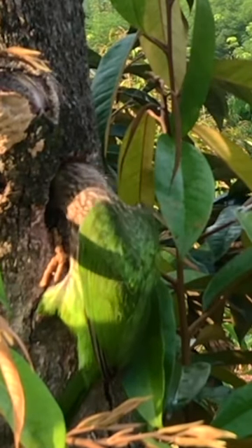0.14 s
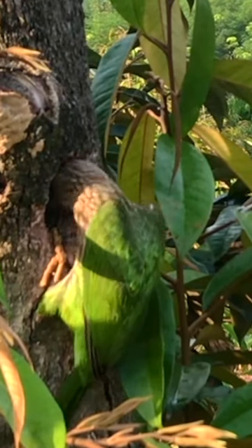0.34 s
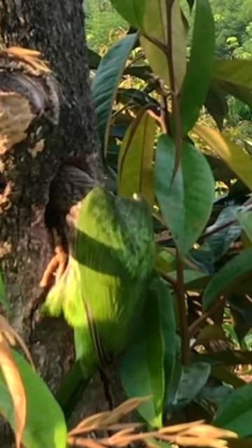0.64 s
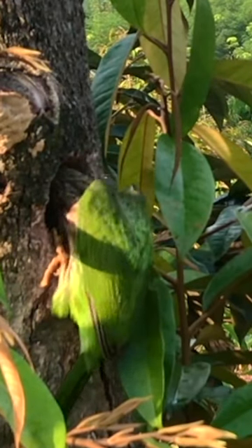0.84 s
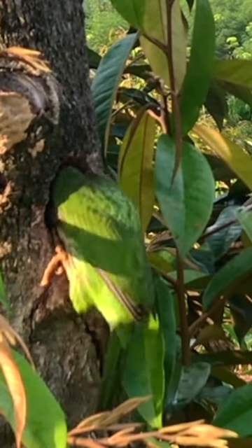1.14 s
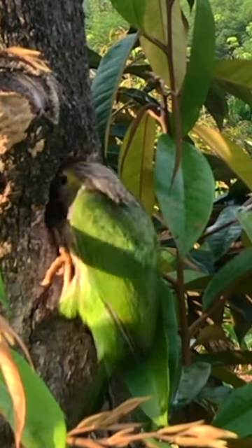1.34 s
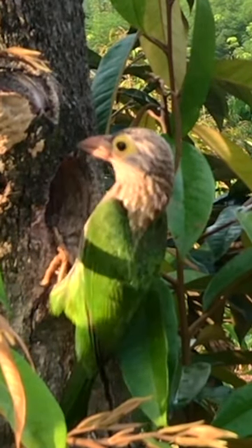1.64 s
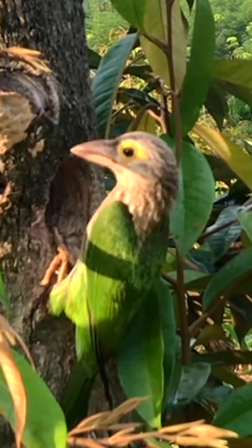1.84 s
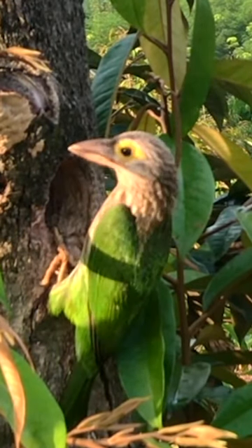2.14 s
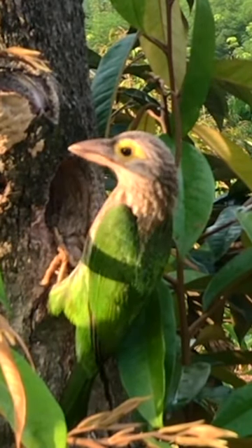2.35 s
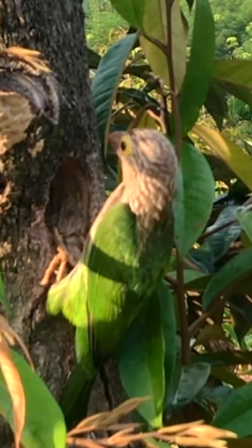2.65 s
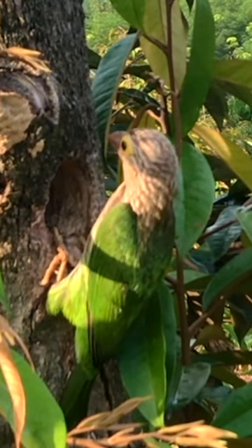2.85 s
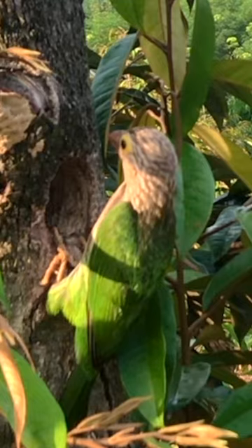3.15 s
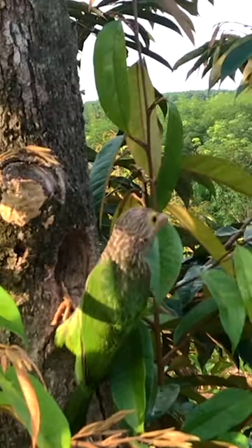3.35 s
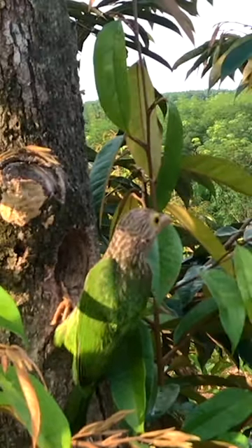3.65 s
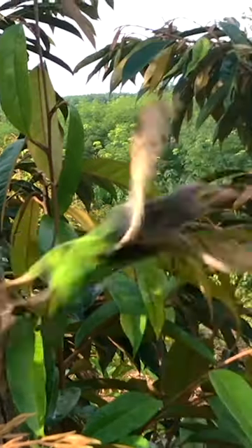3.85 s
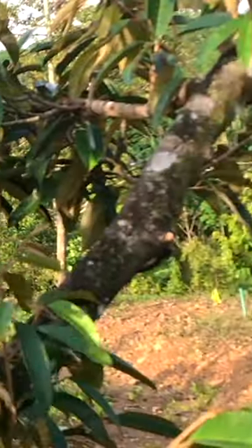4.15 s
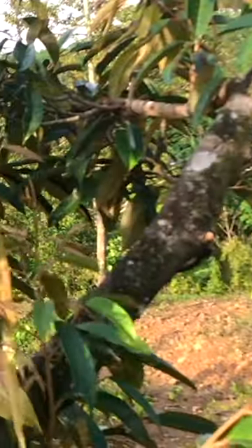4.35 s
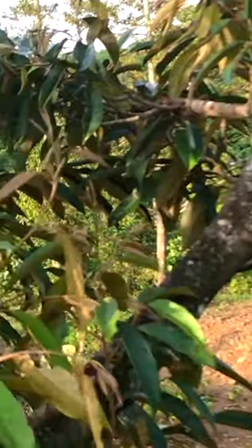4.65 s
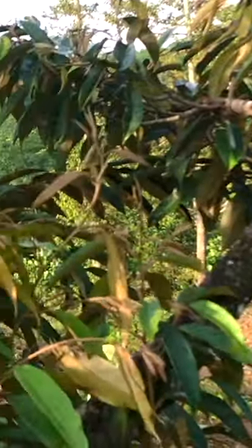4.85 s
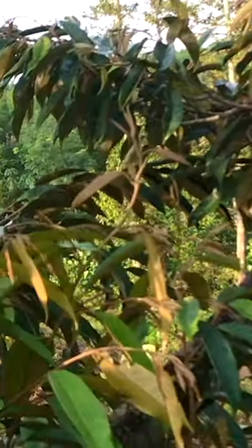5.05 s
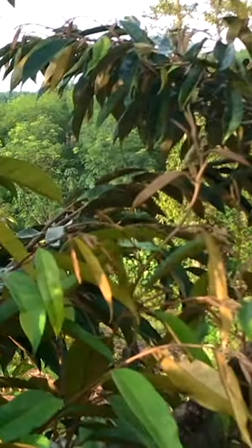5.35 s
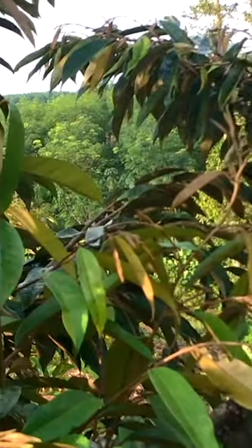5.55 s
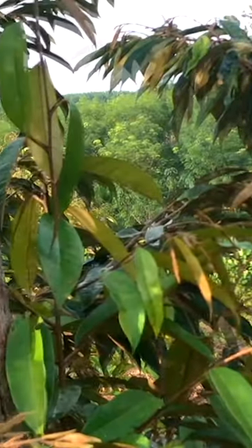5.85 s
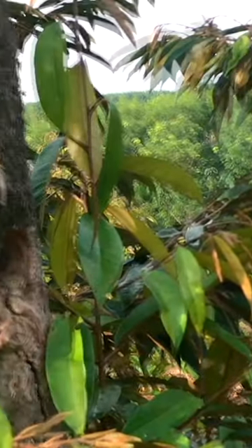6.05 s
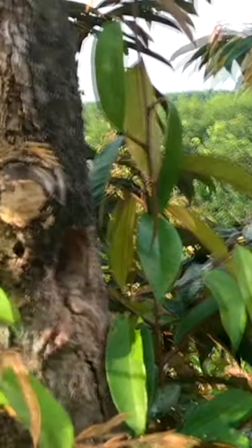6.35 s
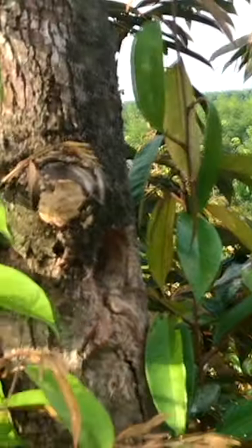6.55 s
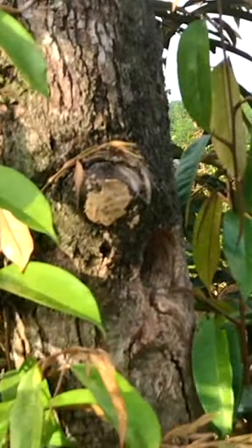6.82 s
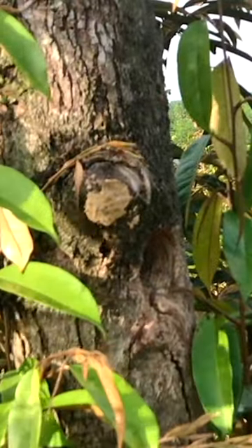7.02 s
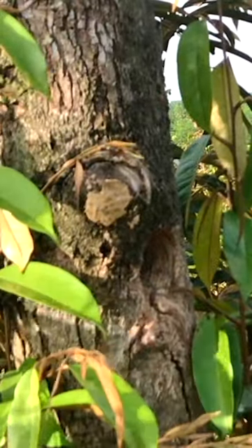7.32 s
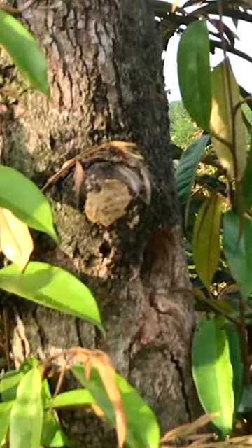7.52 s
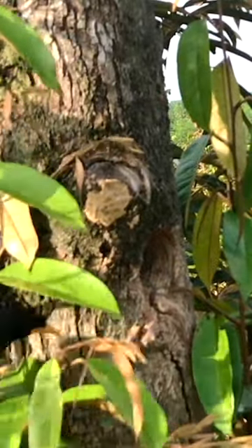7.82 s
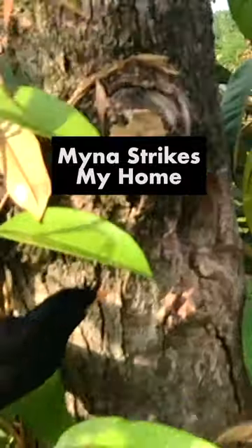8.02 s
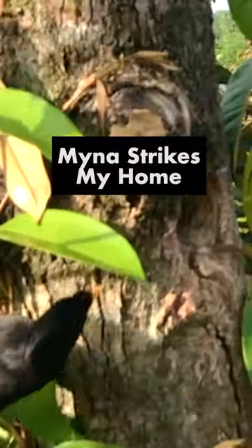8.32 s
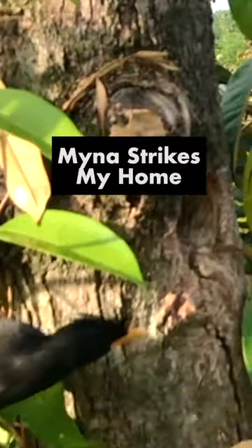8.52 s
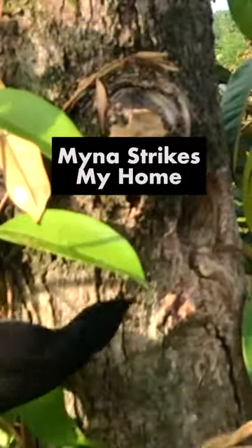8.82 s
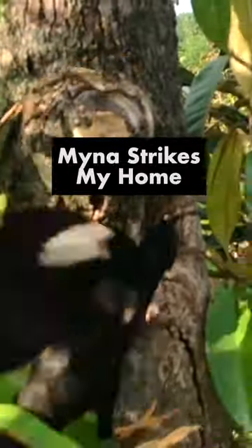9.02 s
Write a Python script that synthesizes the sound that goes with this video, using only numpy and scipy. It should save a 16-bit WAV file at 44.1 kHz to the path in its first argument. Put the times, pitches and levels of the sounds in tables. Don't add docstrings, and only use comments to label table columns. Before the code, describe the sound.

A steady high buzz of cicadas and rapid cricket chirps fill a hot orchard, close to a handheld microphone. Inside a tree hole, nestlings give short soft peeps and hoarse, wheezy rasps, with one bright squeal. The parent takes off with a snap and soft wing beats. The chicks fade, a far bird trills three times, and another bird scrabbles at the bark with crackling feathers and scratching claws.

```python
import sys
import numpy as np
from scipy import signal
from scipy.fft import rfft, irfft
from scipy.io import wavfile
from scipy.ndimage import uniform_filter1d

SR = 44100
rng = np.random.default_rng(int(sys.argv[2]) if len(sys.argv) > 2 else 0)


def amplitude_ratio(level_db):
    exponent = np.asarray(level_db, float) / 20
    return 10 ** exponent


def transcribe(signal):
    frames = np.atleast_2d(signal).T
    limited = np.clip(frames, -1, 1)
    pcm = np.round(limited * 32767).astype(np.int16)
    wavfile.write(sys.argv[1], SR, pcm)


N = 404838
T = np.arange(N) / SR
LATER_S = 6.33


def evened(x):
    return x / np.sqrt(np.mean(x ** 2) + 1e-20)


def add(mix, s, sound):
    part = mix[round(s * SR):][:len(sound)]
    part += sound[:len(part)]


def noise():
    return rng.standard_normal(N)


def sweep(hz):
    return np.sin(2 * np.pi * np.cumsum(hz) / SR)


def column(rows, size=1):
    table = np.array(rows)
    return np.interp(T, table[:, 0], table[:, size])


def shifted(early_db, late_db, at_s):
    return np.where(T > at_s, late_db, early_db)


def coloured(x, points):
    hz, db = np.transpose(points)
    f = np.fft.rfftfreq(N, 1 / SR) + 1
    shape_db = np.interp(np.log(f), np.log(hz), db, -90, -90)
    return evened(irfft(rfft(x) * amplitude_ratio(shape_db), N))


def rung(x, modes):
    f = np.fft.rfftfreq(N, 1 / SR)
    response = sum(amplitude_ratio(db) / (1 + (2 * (f - hz) / width) ** 2) for hz, width, db in modes)
    return evened(irfft(rfft(x) * response, N))


def resonate(x, hz, width):
    turn = np.exp(2j * np.pi * np.cumsum(hz) / SR)
    r = np.exp(-np.pi * width / SR)
    return evened((turn * signal.lfilter([1], [1, -2 * r, r * r], x / turn)).real)


def drift(hz):
    z = rfft(noise())
    return evened(irfft(z * (np.arange(len(z)) < hz * N / SR), N))


def grainy(per_s, size_db, hiss):
    sizes = amplitude_ratio(size_db * np.minimum(rng.exponential(1, N), 3))
    grains = sizes * (rng.random(N) < per_s / SR)
    clumps = evened(signal.lfilter([1], [1, -.98], grains))
    return (clumps + hiss) * noise()


def stroke(first_hz, last_hz, length, rise, overtone_db=()):
    u = np.linspace(0, 1, round(length * SR))
    turns = 2 * np.pi * np.cumsum(first_hz + (last_hz - first_hz) * u) / SR
    tone = np.sin(turns) + sum(amplitude_ratio(db) * np.sin((k + 2) * turns) for k, db in enumerate(overtone_db))
    return tone * np.minimum((u / rise) ** 0.27, (1 - u) / (1 - rise))


def leaves(x, t60, wet_db):
    t = np.arange(SR // 2) / SR
    tail = rng.standard_normal(len(t)) * amplitude_ratio(-60 * t / t60) * (t > .004)
    return x + amplitude_ratio(wet_db) * signal.oaconvolve(x, tail / np.linalg.norm(tail))[:N]


# f/Hz, level/dB per Hz
HISS = [(65, -35), (110, -1), (425, -16), (2880, -21), (4540, -23.5), (5710, -6), (6300, 2), (8130, -20.5),
        (11100, -10.5), (12300, -20), (15800, -21.5)]
RUMBLE = [(30, -21), (44, -5), (55, 9.5), (66, -9)]
DRONE = [(50, -37), (68, 5), (110, -7), (200, -16.5)]


def air():
    hiss = amplitude_ratio(-59) * coloured(noise(), HISS)
    rumble = amplitude_ratio(shifted(-65, -71.5, at_s=4.5)) * coloured(noise(), RUMBLE)
    drone = amplitude_ratio(shifted(-68, -65.5, at_s=5) + 0.5) * coloured(noise(), DRONE)
    return hiss + rumble + drone


def cicadas():
    rattle = np.cumsum(129.8 + .3 * drift(1)) / SR % 1
    puffs = np.exp(-rattle / .35)
    drive = noise() * (puffs + np.where(T < LATER_S, .35, .9))
    early = rung(drive, [(9910, 840, -0.6), (10800, 410, -0.4)])
    late = rung(drive, [(9700, 900, -3), (10950, 880, 7)])
    share = np.clip((T - 6) / .5, 0, 1)
    return amplitude_ratio(shifted(-63.5, -61.5, at_s=6.5) + 0.3) * evened((1 - share) * early + share * late)


# t/s, level/dB
THREES = [(6.351, -7), (6.41, -7.5), (7.01, -5), (7.052, -6), (7.095, -5), (7.155, -5), (7.274, -5),
          (7.314, -4), (7.375, -6.5), (7.762, -7.5), (8.148, -5), (9.168, -8.5)]


def threes():
    rows = np.array(THREES)
    parts = []
    for a, b in zip(rows, rows[1:]):
        phrases = max(round((b[0] - a[0]) / .059), 1)
        parts.append(np.linspace(a, b, phrases, endpoint=False))
    starts = np.concatenate(parts + [rows[-1:]])
    out = np.zeros(N)
    for (s, db), room in zip(starts, np.diff(starts[:, 0], append=10)):
        for k in range(3 if room > .05 else 2):
            level_db = db - 1.5 * k + 1.5 * rng.standard_normal()
            add(out, s + .0168 * k, amplitude_ratio(level_db) * stroke(6090, 6230, .011, .55))
    return out


def shrill_chorus():
    beat = np.cumsum(56.6 * (1 + 0.0453 * drift(5))) / SR % 1
    tone = sweep(5960 + 240 * beat + 25 * drift(30)) * amplitude_ratio(2 * drift(45))
    pulses = tone * np.sin(np.pi * np.clip(beat / 0.58, 0, 1))
    early = 1.74 * leaves(pulses, 0.18, wet_db=-12.5)
    late = 3.3 * leaves(threes(), .2, wet_db=-12)
    crowd = rung(noise(), [(6187, 220, 1.5), (6517, 280, -4), (7210, 90, -10.5)])
    return amplitude_ratio(-53.5) * np.where(T < LATER_S, .7 * early + .65 * crowd, late + .3 * crowd)


def far_crickets():
    far = np.zeros(N)
    for first_hz, last_hz in [(4650, 4380), (4780, 4000), (5200, 4800)]:
        starts = (rng.random(N) < 22 / SR) * amplitude_ratio(2.2 * noise())
        far += signal.oaconvolve(starts, stroke(first_hz, last_hz, 0.0128, 0.63))[:N]
    blur = rung(noise(), [(3250, 270, -15), (4500, 360, 5.5), (5080, 810, -4)])
    scattered = evened(leaves(far, 0.36, wet_db=-23))
    return amplitude_ratio(-65.5 + 0.64 * (T > 6.3)) * scattered + amplitude_ratio(-61.5) * blur


# first t/s, last t/s, level/dB
LOW_BOUTS = [
    (6.44, 6.76, -67),
    (6.9, 7.07, -73),
    (7.52, 7.62, -69),
    (8.261, 8.711, -66.5),
    (8.76, 8.81, -68),
]


def low_cricket():
    out = np.zeros(N)
    for first, last, db in LOW_BOUTS:
        for s in np.linspace(first, last, round((last - first) / .0343) + 1):
            add(out, s, amplitude_ratio(db + 2 * rng.standard_normal()) * stroke(3380, 3140, 0.022, 0.57))
    return amplitude_ratio(-4.5) * leaves(out, .15, wet_db=-0.5)


# start t/s, end t/s, first f/Hz, last f/Hz, level/dB
WHISTLES = [(4.75, 4.807, 320, 487, -68), (4.846, 6.489, 467, 408.3, -76), (5.743, 6.197, 540, 482, -70.5),
            (5.747, 6.42, 1076, 928, -70.5), (8.4, 8.47, 2350, 2340, -66), (8.82, 8.875, 2310, 2270, -66),
            (6.65, 6.69, 4061, 3300, -67), (7.09, 7.13, 4030, 3600, -65), (7.315, 7.35, 4000, 3230, -64),
            (7.503, 7.555, 3790, 2850, -67), (8.539, 8.57, 4400, 3120, -63)]


def whistles():
    out = np.zeros(N)
    for start, end, first_hz, last_hz, db in WHISTLES:
        pitch = np.linspace(first_hz, last_hz, round((end - start) * SR))
        wobble = evened(uniform_filter1d(rng.standard_normal(len(pitch)), size=400))
        tone = sweep(pitch * (1 + .018 * wobble))
        add(out, start, amplitude_ratio(db) * tone * signal.windows.tukey(len(pitch), .3))
    return out


# first note t/s, last note t/s, first f/Hz, settled f/Hz, level/dB
TRILLS = [
    (6.542, 6.856, 1886, 1806, -55.5),
    (7.422, 7.738, 2000, 1880, -51.5),
    (8.386, 8.703, 1940, 1892, -51),
]


def trills():
    out = np.zeros(N)
    for first, last, first_hz, hz, db in TRILLS:
        count = round((last - first) / .0355) + 1
        for k, s in enumerate(np.linspace(first, last, count)):
            u = np.linspace(0, 1, round(780 + 35 * k))
            pitch = hz + (first_hz - hz) * np.exp(-k / 1.4) + (70 - 18 * k) * (.5 - u)
            weak_db = -3 * (k == 0) - 1.8 * (k == count - 1)
            add(out, s, amplitude_ratio(db + weak_db) * sweep(pitch) * signal.windows.tukey(len(u), .45))
    return out


def far_singers():
    out = low_cricket() + whistles() + trills()
    return leaves(out * amplitude_ratio(1.1 * drift(30)), .9, wet_db=-10)


# first stroke t/s, level/dB
DEEP_GROUPS = [(0.26, -41.5), (.469, -40), (0.676, -40), (.884, -39.5), (1.125, -40.5), (2.285, -52),
               (5.377, -43), (5.601, -43), (5.821, -45.5), (6.042, -48.5), (6.261, -52), (8.746, -45)]
# t/s, level/dB
STRAY_STROKES = [
    (8.812, -48),
    (8.948, -49),
    (8.982, -48),
    (9.02, -41),
    (9.162, -46),
]


def deep_cricket():
    out = np.zeros(N)
    for s, db in DEEP_GROUPS:
        for k, c in enumerate(rng.standard_normal(3)):
            sound = stroke(5330 + 40 * c, 4350, .024, 0.65, overtone_db=(-30,))
            add(out, s + .0343 * k, amplitude_ratio(db - 2 * (k == 0) + c) * sound)
    for s, db in STRAY_STROKES:
        add(out, s, amplitude_ratio(db) * stroke(5700, 4340, 0.0178, 0.95, overtone_db=(-30,)))
    return out


# first group t/s, last group t/s, strokes a group, level/dB
HIGH_SERIES = [(.079, .079, 3, -41.5), (.364, .364, 1, -39), (.587, .587, 3, -46), (0.808, 2.803, 3, -46),
               (3.097, 3.097, 2, -45), (5.128, 5.128, 2, -43.5), (5.347, 5.776, 3, -41),
               (5.992, 5.992, 3, -45), (6.208, 6.208, 3, -49), (6.82, 6.82, 3, -56), (7.05, 7.05, 2.2, -54),
               (7.266, 7.479, 2, -52), (8.205, 8.205, 4, -51), (8.462, 8.462, 4, -49),
               (8.722, 8.722, 2.4, -51)]


def high_cricket():
    out = np.zeros(N)
    for first, last, strokes, db in HIGH_SERIES:
        for s in np.linspace(first, last, round((last - first) / .222) + 1):
            for k in range(round(strokes)):
                swell_db = min(k, 2) - min(strokes - 1, 2) / 2
                level_db = db + swell_db + 2.6 * rng.standard_normal()
                first_hz = 5300 + 50 * rng.standard_normal()
                sound = stroke(first_hz, 4750, 0.0169, 0.86, overtone_db=(-30,))
                add(out, s + .0362 * k, amplitude_ratio(level_db) * sound)
    return out


def bout(first, last, beats, db, lag):
    k = np.arange(round(beats) + 1)
    late = lag * (1 - np.exp(-k / 2.5))
    times = first + late + (last - first - late[-1]) * k / k[-1]
    return np.transpose([times, db - 193 * lag * np.exp(-k / 0.51)])


# first t/s, last t/s, beats, level/dB, lag of the cold start/s
NEAR_BOUTS = [(0.215, 1.085, 18, -37, 0.027), (1.128, 2.159, 21, -37, 0.0024),
              (2.398, 2.506, 2, -41, 0.013), (2.562, 3.277, 15, -37, 0.015),
              (3.322, 3.994, 14, -37, 0.0018), (4.545, 4.661, 2, -45, 0.0037),
              (4.717, 5.747, 21, -37, 0.014), (5.969, 6.129, 3, -41, 0.015), (6.182, 6.279, 2, -43, 0),
              (6.324, 6.43, 2, -48, 0.0015), (6.54, 6.783, 5, -40, 0.02), (7.233, 7.348, 2, -46.5, .003),
              (7.397, 7.824, 9, -39, 0.016), (8.265, 8.318, 1, -38.5, 0.0016),
              (8.816, 8.871, 1, -41.5, 0.0074), (8.917, 9.151, 5, -38, 0.0089)]


def near_cricket():
    out = np.zeros(N)
    for s, db in np.concatenate([bout(*row) for row in NEAR_BOUTS]):
        a, b, c = rng.standard_normal(3)
        overtones = (-24, -29 - 12 * (s > LATER_S))
        opening = stroke(4700 + 35 * a, 4434, 0.01, 0.85, overtones)
        closing = stroke(4690 + 35 * b, 4404, 0.013, 0.85, overtones)
        add(out, s + .003, amplitude_ratio(db - 0.55 + 1.2 * c) * opening)
        add(out, s + .0165, amplitude_ratio(db - 1 + 0.83 * b) * closing)
    return out


def crickets():
    three = near_cricket() + high_cricket() + deep_cricket()
    return amplitude_ratio(-1.4) * leaves(three, 0.12, wet_db=-10) + far_crickets()


# f/Hz, level/dB per Hz
BODY = [(180, -21), (400, -10.5), (900, -9), (2000, -1), (3800, 5), (5500, 7), (8000, -2.5), (10000, -16)]
FEATHER = [(7000, -4), (9500, 0), (12500, -1), (15900, 0)]
# t/s, body level/dB, feather level/dB
FLURRIES = [
    [(0.7, -92, -76), (1.036, -99, -84), (1.1, -91, -83.5)],
    [(2.2, -89, -81), (2.29, -71, -82), (2.4, -69, -82), (2.46, -68, -78), (2.55, -73.5, -86),
     (2.62, -67, -82), (2.7, -96, -86), (2.84, -87, -88), (2.9, -87, -73), (3.0, -92, -86)],
    [(3.85, -96, -79), (3.894, -75, -72), (4.5, -82, -84)],
    [(7.5, -81, -80), (7.876, -69.5, -63), (8.16, -82.5, -91)],
    [(8.87, -73, -86), (8.93, -78, -67), (8.945, -66.5, -59), (8.965, -72, -70), (9.008, -65.5, -64),
     (9.035, -77, -69), (9.068, -69.5, -64), (9.105, -66.5, -67), (9.14, -78, -75), (9.18, -76, -64)],
]


def flurries():
    drive = grainy(800, 2.8, .6) * amplitude_ratio(2 * drift(40))
    body, feather = coloured(drive, BODY), coloured(drive, FEATHER)
    pushes = sum(amplitude_ratio(-2.5 * k) * np.exp(-((T - 4.06 - k / 13) / 0.01) ** 2) for k in range(4))
    out = amplitude_ratio(-59) * pushes * rung(noise(), [(320, 310, 0)])
    for rows in FLURRIES:
        fade = np.clip(np.minimum(T - rows[0][0], rows[-1][0] + 0.037 - T) / 0.0061, 0, 1)
        out += fade * amplitude_ratio(column(rows) + 18.5) * body
        out += fade * amplitude_ratio(column(rows, size=2) + 10) * feather
    return out


# t/s, peak level/dB
SNAPS = [(3.897, -37), (4.0087, -28.5), (4.055, -36), (4.1325, -40.5), (4.214, -38), (6.807, -38),
         (6.9122, -41), (7.6695, -33), (7.866, -34), (7.8814, -51), (8.08, -34.5), (8.117, -47),
         (8.371, -45), (8.937, -48), (8.945, -32), (8.97, -32), (8.976, -32), (9.0079, -32), (9.062, -35),
         (9.071, -36), (9.095, -41), (9.1053, -30), (9.177, -36)]


def snaps():
    out, t = np.zeros(N), np.arange(900) / SR
    for s, db in SNAPS:
        fall = amplitude_ratio(-60 * t / .006) + .5 * amplitude_ratio(-60 * t / .04)
        add(out, s, amplitude_ratio(db - 7) * rng.standard_normal(900) * fall)
    bright = signal.lfilter(*signal.butter(1, 1500, "high", fs=SR), out)
    return signal.sosfilt(signal.butter(10, 15600, fs=SR, output="sos"), bright)


# t/s, peak level/dB, ring f/Hz
CATCHES = [(6.772, -56, 2700), (6.807, -54, 2600), (7.143, -51, 3220), (8.918, -58, 3500),
           (8.944, -55, 3000), (8.971, -47, 2540), (8.983, -51, 3400), (9.007, -45, 3390),
           (9.06, -45, 3940), (9.0656, -40, 3680), (9.0708, -39, 3600), (9.077, -37, 3720),
           (9.083, -45, 3500), (9.0948, -41, 3730), (9.104, -39, 3330), (9.11, -51, 3400),
           (9.172, -44, 3320), (9.177, -51, 2800)]


def catches():
    out, t = np.zeros(N), np.arange(700) / SR
    for s, db, hz in CATCHES:
        ring = amplitude_ratio(-60 * t / 0.011) * np.sin(2 * np.pi * hz * t)
        scratch = rng.standard_normal(700) * amplitude_ratio(-60 * t / 0.017)
        hit = signal.fftconvolve(scratch, ring)
        add(out, s, amplitude_ratio(db) * hit / abs(hit).max())
    return leaves(out, 0.077, wet_db=-7)


# from t/s, until t/s, level drop/dB
HUSHES = [
    (0.532, 0.59, -3.5),
    (0.922, 0.959, -5),
    (1.853, 1.945, -6),
    (2.043, 2.092, -12),
    (2.685, 2.757, -5),
]


def hush():
    return amplitude_ratio(sum(db * np.clip(np.minimum(T - a, b - T) / .006, 0, 1) for a, b, db in HUSHES))


# start t/s, end t/s, first pulses/s, last pulses/s, peak level/dB
CREAKS = [
    (.325, .405, 122, 88, -53),
    (0.413, 0.436, 200, 200, -48),
    (0.543, 0.589, 90, 120, -48),
    (0.587, .626, 130, 200, -42.5),
    (.86, 0.922, 150, 140, -53),
]


def creaks():
    out, t = np.zeros(N), np.arange(400) / SR
    ring = np.sin(2 * np.pi * 3350 * t) + 0.37 * np.sin(2 * np.pi * 1700 * t)
    click = amplitude_ratio(-60 * t / .012) * ring
    for start, end, first, last, db in CREAKS:
        rate = np.linspace(first, last, round((end - start) * SR))
        for at in np.flatnonzero(np.diff(np.floor(np.cumsum(rate) / SR))):
            s = start + at / SR + 0.00098 * rng.standard_normal()
            add(out, s, amplitude_ratio(db + 2.5 * rng.standard_normal()) * click)
    return out


# start t/s, length/s, level/dB, first f/Hz, last f/Hz
WHEEZES = [(0.02, 0.12, -61.5, 3250, 3200), (0.413, 0.027, -56, 3600, 3300),
           (0.451, 0.068, -51, 3080, 3060), (0.609, 0.095, -47, 3010, 3150),
           (0.681, 0.047, -51, 3250, 3830), (0.81, 0.027, -48, 4020, 3850), (0.817, 0.034, -46, 3030, 2920),
           (0.869, .05, -52.5, 2920, 2990), (0.967, .03, -58, 3950, 3900), (1.015, 0.066, -57, 4000, 2720),
           (1.099, .05, -57.5, 2850, 3080), (1.253, .06, -62, 3270, 2900), (1.315, .025, -54, 3470, 3470),
           (1.761, 0.046, -62, 3340, 2980), (2.111, 0.072, -49.5, 3970, 4400),
           (2.233, .06, -77, 3930, 3900), (2.27, .17, -55, 4000, 3950), (2.265, 0.16, -59, 5320, 5100),
           (2.453, 0.082, -55, 4000, 4260), (2.589, 0.076, -50, 4400, 3820),
           (2.638, 0.048, -52.5, 3000, 3100), (2.818, .1, -54.5, 2940, 3000),
           (1.955, 0.077, -61.5, 1600, 2380), (2.873, .045, -49, 4200, 3800),
           (2.918, 0.066, -48.5, 3980, 4050), (3.51, 0.13, -64, 2980, 3300), (4.067, .06, -61, 3250, 3300),
           (4.1, 0.066, -55.5, 4080, 4200), (4.22, 0.068, -60, 3250, 3350), (4.945, 0.11, -66, 3220, 2800),
           (0.634, 0.047, -57.5, 1760, 1700), (0.736, 0.062, -62, 1800, 1820),
           (0.808, 0.039, -56, 1960, 1820), (1.429, 0.076, -59, 1740, 1500), (1.47, .07, -59.5, 1140, 1080),
           (2.272, 0.053, -54, 1560, 1520), (2.749, 0.068, -52.5, 1480, 1350),
           (3.189, 0.078, -57.5, 1360, 1280), (3.766, 0.044, -59.5, 1700, 1530),
           (0.324, 0.036, -61.5, 3170, 3030)]


def wheezes():
    out, flow = np.zeros(N), grainy(700, 2, 1.1)
    for s, length, db, first_hz, last_hz in WHEEZES:
        air_flow = flow[round(s * SR):][:round(length * SR)]
        glide = np.linspace(first_hz, last_hz, len(air_flow))
        voice = resonate(air_flow, glide, 230) + .5 * resonate(air_flow, glide, 980)
        add(out, s, amplitude_ratio(db) * voice * signal.windows.tukey(len(glide), 0.49))
    return leaves(out + creaks(), 0.086, wet_db=-11.5)


# top t/s, dying time/s, hollow level/dB, throat level/dB
BEGS = [(.08, 0.14, -55, -50), (0.489, 0.049, -60, -50), (0.659, 0.12, -56.5, -46), (.84, 0.17, -55, -43),
        (1.05, 0.15, -56, -46.5), (1.33, 0.085, -58.5, -53), (1.48, 0.14, -52.5, -56),
        (1.79, 0.048, -54.5, -56), (1.98, 0.13, -53.5, -76), (2.131, 0.064, -49.5, -46.5),
        (2.29, 0.21, -51.5, -45.5), (2.667, 0.0065, -50, -49), (2.77, 0.71, -53, -64),
        (2.909, 0.1, -52.5, -45.5), (3.139, 0.045, -55, -52.5), (3.22, 0.35, -56.5, -64),
        (3.44, 0.15, -59.5, -65), (3.56, 0.12, -56.5, -52.5), (3.73, 0.025, -50, -71),
        (3.84, 0.47, -56.5, -78), (4.07, 0.16, -55, -49), (4.27, 0.29, -57, -56.5),
        (4.51, 0.19, -57.5, -55.5), (4.82, .03, -59, -58), (4.857, 0.044, -56, -52),
        (4.98, 0.09, -57.5, -64), (5.36, 0.15, -62.5, -86), (5.5, 0.051, -61, -85),
        (5.621, 0.047, -59, -82), (5.88, 0.079, -66.5, -84), (6.36, 0.052, -67.5, -82)]


def effort(drop_db, size):
    rows, t = np.array(BEGS), T[::64]
    since = t - rows[:, :1]
    away = np.maximum(-since / 0.076, since / rows[:, 1:2])
    return np.interp(T, t, np.max(rows[:, size, None] - drop_db * away, axis=0))


def hollow_effort():
    return effort(9.5, size=2)


# f/Hz, width/Hz, level/dB
HOLLOW = [(628, 99, -5.5), (900, 182, 0.5), (1390, 420, -4), (1804, 810, -1.5)]
# t/s, f/Hz
GAPE = [(0, 3460), (.94, 3050), (1.05, 3470), (1.5, 3460), (1.65, 4230), (2.55, 3940), (2.67, 3315),
        (2.86, 3870), (3.5, 4030), (3.56, 3350), (6.5, 3140)]


def rasp():
    early = np.clip((6.5 - T) / 0.11, 0, 1)
    breath, air_flow = grainy(500, 2, 1), grainy(700, 1.5, 1.2)
    murmur_db = np.where(T < 5.05, -63.5, -79.5)
    low_cut = signal.butter(4, 514, "high", fs=SR, output="sos")
    hollow = amplitude_ratio(np.maximum(hollow_effort(), murmur_db)) * signal.sosfilt(low_cut, rung(breath, HOLLOW))
    throat = amplitude_ratio(effort(11, size=3) - 4.5) * resonate(air_flow, column(GAPE), 2900)
    return early * (hollow + throat) + wheezes()


def contour(start, length, hz, db, share):
    rest = 1 - share
    return [(start, hz - 392 * share * length, db - 9 * share),
            (start + share * length, hz, db),
            (start + length, hz - 590 * rest * length - 15, db - 14.5 * rest)]


def peep(rows, bright_db, hoarse):
    s, hz, db = np.transpose(rows)
    t = np.arange(s[0], s[-1], 1 / SR)
    hz, db = np.interp(t, s, hz), np.interp(t, s, db)
    wobble = hoarse * evened(uniform_filter1d(rng.standard_normal((2, len(t))), size=500))
    turns = 2 * np.pi * np.cumsum(hz * (1 + 0.015 * wobble[0])) / SR
    tone = np.sin(turns) + sum(amplitude_ratio(step) * np.sin((k + 2) * turns) for k, step in enumerate(bright_db))
    fade = signal.windows.tukey(len(t), min(700 / len(t), 1))
    return s[0], np.sqrt(2) * amplitude_ratio(db + 2.24 * wobble[1]) * tone * fade


# start t/s, length/s, top f/Hz, top level/dB, share of the length before the top
PEEPS = [(0.128, 0.069, 900, -54, 0.85), (0.204, 0.043, 900, -49, .4), (0.241, 0.057, 960, -51, 0.67),
         (0.288, 0.04, 914, -47, 0.42), (0.329, 0.032, 892, -52.5, 0.44), (0.649, 0.036, 900, -57, 0.54),
         (0.724, 0.088, 914, -52.5, 0.48), (0.81, 0.079, 941, -50.5, 0.9), (.905, 0.022, 895, -55, 0.34),
         (1.022, 0.089, 880, -59, 0.3), (1.218, 0.23, 994, -54.5, 0.51), (1.407, 0.028, 926, -56, .6),
         (1.472, 0.021, 913, -49.5, 0.5), (1.5, 0.028, 885, -55, .3), (1.536, 0.049, 886, -47.5, 0.23),
         (1.769, 0.078, 960, -54.5, 0.43), (1.843, 0.18, 982, -51.5, 0.43),
         (2.011, 0.024, 915, -45.5, 0.28), (2.043, 0.038, 900, -52, 0.46), (2.76, 0.018, 948, -50, .4),
         (3.148, 0.097, 981, -52, 0.62), (3.334, 0.067, 929, -52.5, 0.046), (3.67, 0.034, 1000, -55, .7),
         (3.7, 0.04, 1000, -46, 0.38), (3.746, 0.052, 940, -48.5, 0.12), (3.793, 0.043, 884, -53.5, .2),
         (3.845, 0.058, 950, -62, 0.37), (4.091, 0.048, 917, -48.5, 0.16), (4.592, 0.092, 900, -51, 0.61),
         (5.001, 0.1, 1016, -48.5, 0.04), (5.046, 0.13, 965, -53, 0.2), (5.136, 0.1, 891, -50.5, 0.53),
         (5.467, 0.061, 937, -52, 0.8), (5.592, 0.14, 905, -46.5, 0.028), (5.693, 0.11, 941, -52.5, 0.95),
         (5.849, 0.15, 980, -51, 0.21), (5.967, 0.05, 945, -54.5, .05), (6.046, 0.031, 911, -57, 0.46),
         (6.075, 0.16, 895, -56.5, 0.26)]
# t/s, f/Hz, level/dB
SQUEAL = [(2.672, 1107, -45), (2.685, 1073, -41.5), (2.7, 1004, -46), (2.725, 1070, -42), (2.745, 997, -49),
          (2.757, 930, -41), (2.765, 900, -52)]


def nestlings():
    nest = np.zeros(N)
    strain = np.clip((hollow_effort() + 66.5) / 10, 0, 1)
    for row in PEEPS:
        s, hz = row[0], row[2]
        bright_db = (-13, -27)
        if s > 4.5 or 2 < s < 2.1:
            bright_db = (-8, -23) if hz < 915 or hz > 1000 else (-16, -29)
        hoarse = 0.58 + 0.67 * strain[round(s * SR)]
        add(nest, *peep(contour(*row), bright_db, hoarse))
    add(nest, *peep(SQUEAL, (-4, -14, -19), hoarse=.2))
    return leaves(nest, 0.25, wet_db=-6)


def scene():
    insects = cicadas() + shrill_chorus() + crickets()
    climber = snaps() + catches()
    hushed = hush() * (flurries() + rasp())
    return (air() + insects + far_singers() + climber + hushed + nestlings())[None]


def low_pass(x):
    return signal.sosfilt(signal.butter(12, 15960, fs=SR, output="sos"), x)


# t/s, length of each slope/s
DIPS = [
    (3.332, 0.009),
    (8.071, 0.01),
]


def record(dry):
    gain = np.prod([np.clip(abs(T - s) / length, 0, 1) for s, length in DIPS], axis=0)
    return low_pass(dry * gain)


dry = scene()
out = record(dry)
transcribe(out)
```